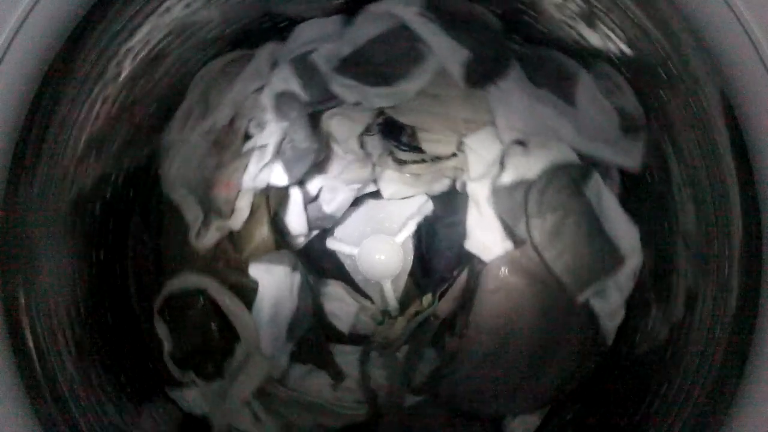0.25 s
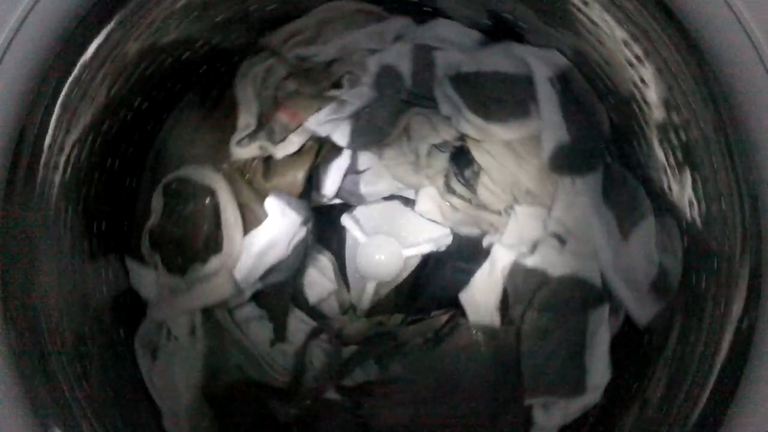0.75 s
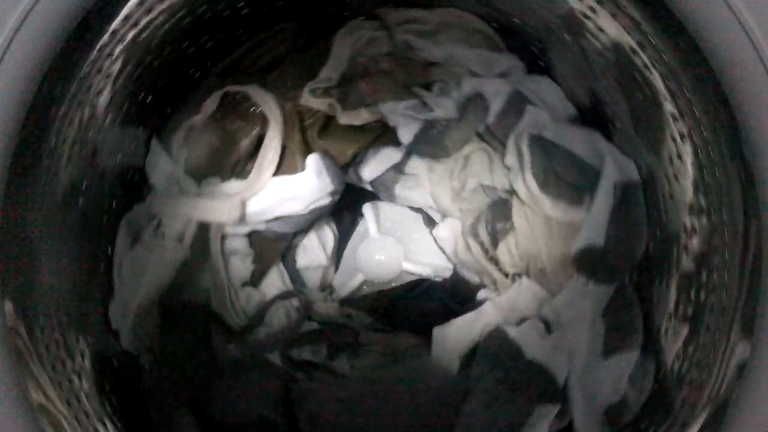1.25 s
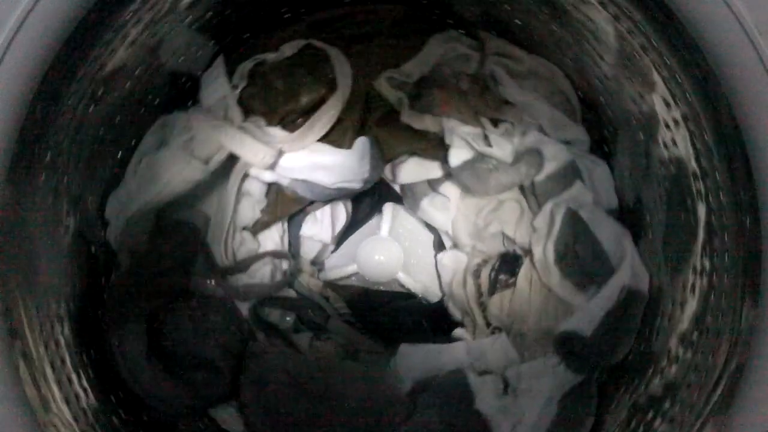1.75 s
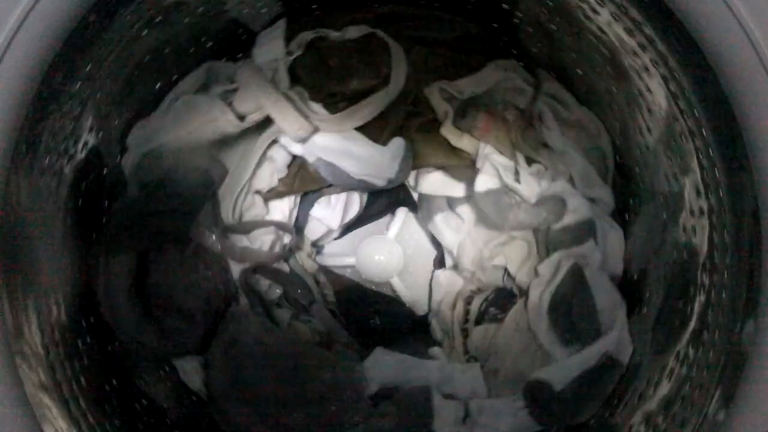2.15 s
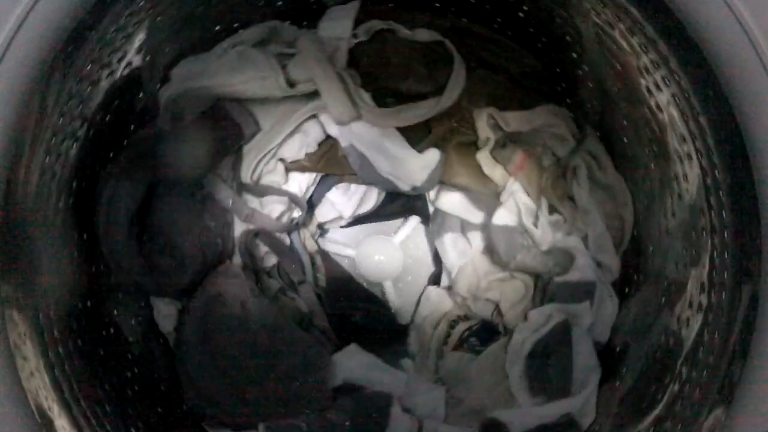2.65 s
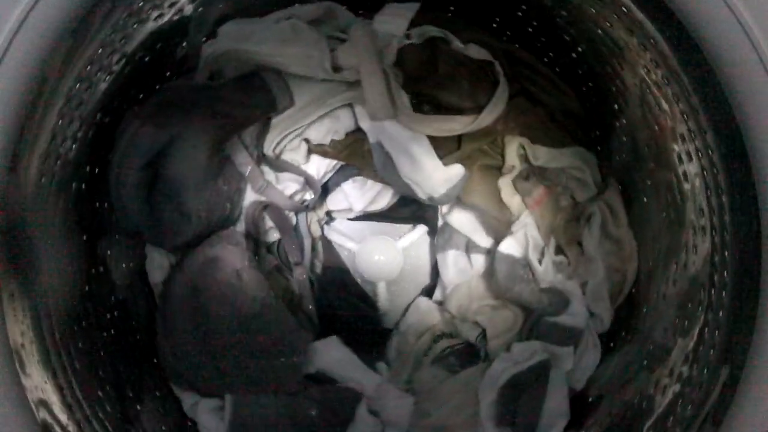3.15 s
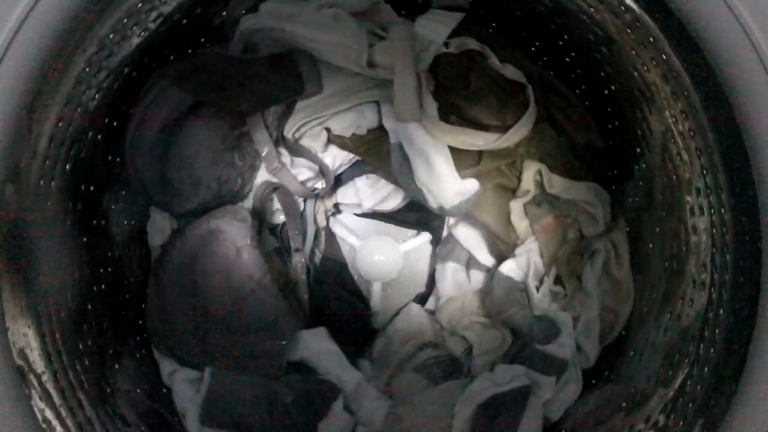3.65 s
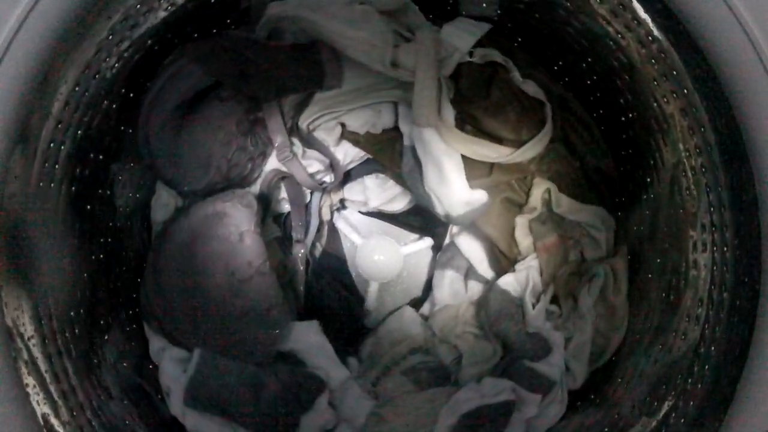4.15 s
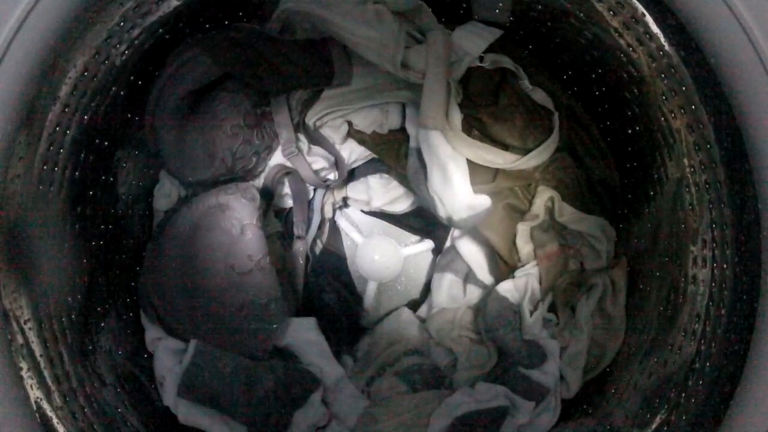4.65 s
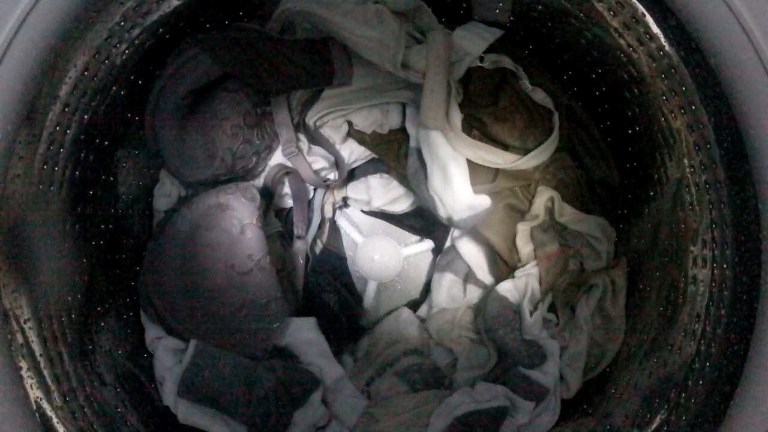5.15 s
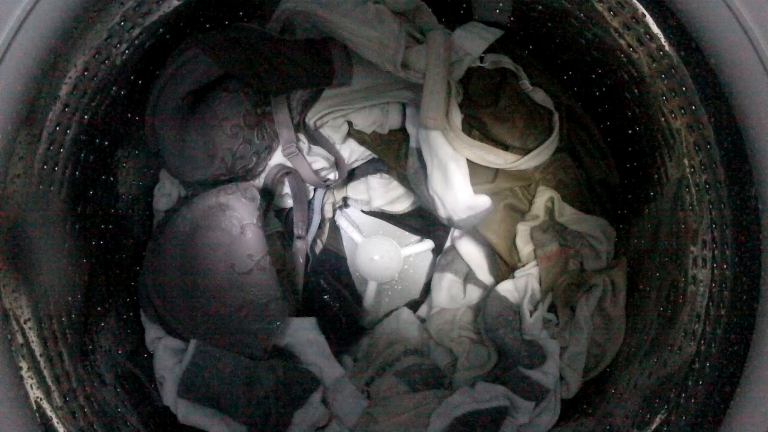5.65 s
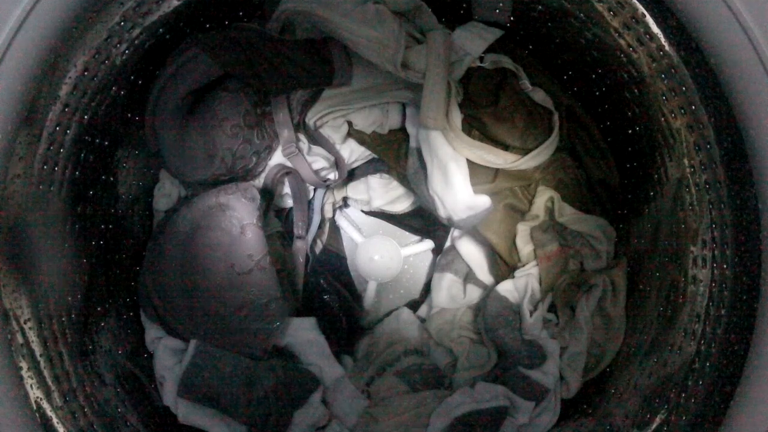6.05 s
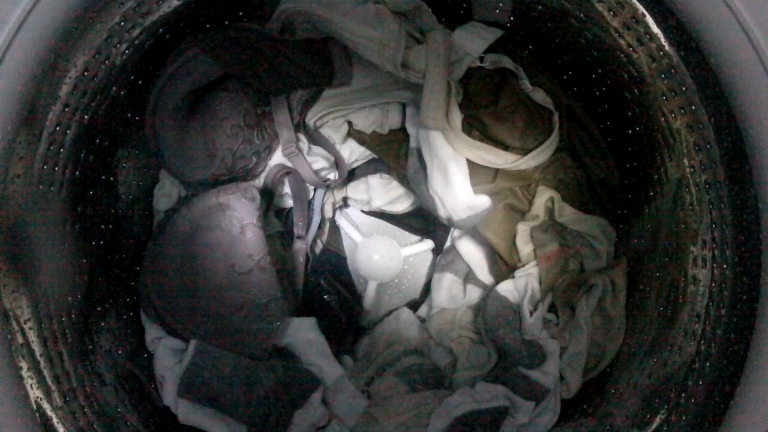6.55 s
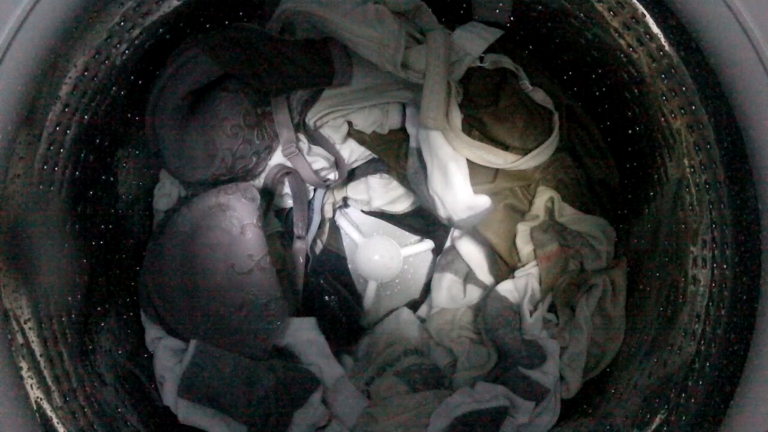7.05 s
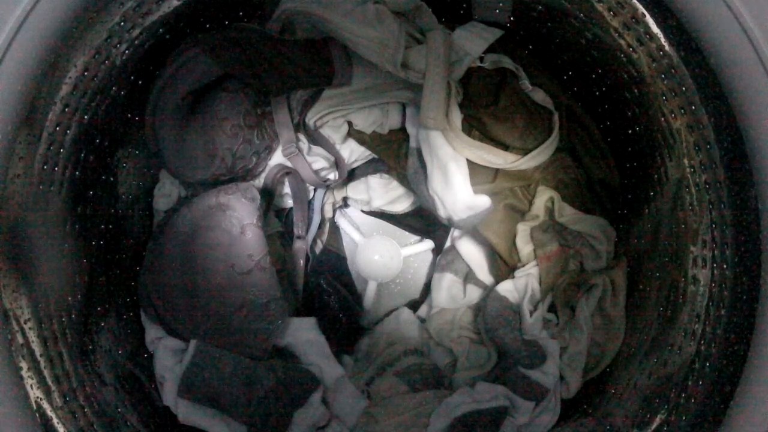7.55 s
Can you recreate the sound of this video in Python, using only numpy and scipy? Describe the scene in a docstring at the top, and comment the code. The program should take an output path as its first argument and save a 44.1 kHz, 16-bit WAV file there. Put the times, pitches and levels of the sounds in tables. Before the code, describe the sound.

Water drips and trickles through wet laundry in a steel washing machine drum, sparse at first, then a busy patter over low hum.

```python
"""Water trickles and drips through laundry into the steel drum of a washing machine: many short rising bubble
tones over splash noise, with larger drops, bright droplets, plops and gurgles on top.
The drum answers them with a short diffuse tail; a small camera hears the water through its resonant case.
Underneath lie inlet hiss, cabinet rumble, booming panels, narrow resonances and mains hum, all shaped noise or sines.
The camera holds each of 12000 samples a second as a step, so the sound is mirrored around 12 kHz."""
import sys
import numpy as np
from scipy import signal
from scipy.fft import rfft, irfft, next_fast_len
from scipy.io import wavfile
from scipy.ndimage import map_coordinates

SR = 44100
rng = np.random.default_rng(int(sys.argv[2]) if len(sys.argv) > 2 else 0)


def log_audio(samples):
    """Write samples as a 16-bit WAV file to the path given in sys.argv[1]."""
    # one column per channel
    frames = np.atleast_2d(samples).T
    # limit to full scale, then quantise
    limited = np.clip(frames, -1, 1)
    pcm = np.round(limited * 32767).astype(np.int16)
    wavfile.write(sys.argv[1], SR, pcm)


N = 343539

# Water let go by the load. Each row: start in seconds, level in dB before swell and fall, time to lose 10 dB in seconds.
SURGES = [(0.13, -32, 0.0011), (0.36, -36.5, 0.0688), (0.98, -36.5, 0.2325), (1.81, -32, 0.1189),
          (2.6, -40.5, 0.7242), (3.3, -31, 0.8326), (6.4, -43, 2)]
# Fine spray. Each row: time in seconds, level in dB rms.
SPRAY = [(0, -54.5), (.38, -51), (.75, -58), (1.0, -45.5), (1.25, -57), (1.9, -50), (2.28, -53),
         (2.75, -48.5), (3.23, -48), (3.6, -42.5), (4.1, -46.5), (4.5, -44.5), (6.0, -43), (7.45, -42.5),
         (7.79, -44.5)]
# Large drops into pooled water. Each row: start in seconds, peak in dB, starting pitch of the bubble in Hz.
DROPS = [(0.3479, -28.5, 2737), (0.3855, -22, 2543), (0.402, -23.5, 2386), (0.83, -17, 2862),
         (1.0002, -22, 2339), (1.021, -20.5, 2328), (1.0392, -6, 2279), (1.068, -9, 2569),
         (1.2938, -24.5, 2496), (1.785, -26, 2666), (1.8043, -12.5, 2660), (1.837, -23, 2003),
         (2.0203, -19.5, 2372), (2.3501, -25.5, 2259), (2.4407, -24, 2292), (2.4978, -22, 2381),
         (2.6065, -26, 2690), (2.6254, -22, 2600), (2.824, -26.5, 2543), (3.027, -23.5, 2696),
         (3.0626, -23, 2432), (3.2909, -16, 2577), (3.3025, -8.5, 2686), (3.3287, -18.5, 2593),
         (3.3856, 4, 2651), (3.3935, -8.5, 2772), (3.4348, -12.5, 2728), (3.4529, -16.5, 2536),
         (3.4955, -18.5, 2377), (3.5453, -14.5, 2566), (3.5862, -28, 2507), (3.5979, -13.5, 2472),
         (3.6328, -17, 2608), (3.7544, -27.5, 2601), (3.807, -16, 2473), (3.8462, -18.5, 2623),
         (3.87, -14.5, 2617), (3.9771, -14.5, 2431), (4.0969, -8.5, 2568), (4.181, -23.5, 2506),
         (4.2096, -17.5, 2372), (4.3072, -23.5, 2529), (4.363, -14.5, 2324), (4.4156, -16, 2524),
         (4.5802, -23.5, 2586), (4.686, -27, 2717), (4.737, -24.5, 2557), (4.8209, -12, 2454),
         (4.8935, -15.5, 2695), (5.002, -24, 2640), (5.028, -20, 2570), (5.1701, -18, 2578),
         (5.5508, -24.5, 2621), (5.753, -19.5, 2601), (5.8604, -16.5, 2622), (5.9795, -26, 2603),
         (6.026, -25.5, 2500), (6.0692, -23, 2530), (6.113, -24.5, 2530), (6.1773, -23.5, 2665),
         (6.2473, -23.5, 2574), (6.3841, -14, 2472), (6.5326, -11.5, 2326), (6.563, -25.5, 2662),
         (6.6322, -18, 2744), (6.8066, -20.5, 2605), (6.8394, -25.5, 2799), (6.857, -17.5, 2650),
         (6.9404, -19.5, 2480), (6.9788, -23, 2570), (7.1415, -17.5, 2553), (7.2268, -24.5, 2614),
         (7.2834, -10, 2436), (7.5298, -27, 2616)]
# Droplets bursting on steel and cloth. Each row: start in seconds, peak in dB, starting pitch in Hz.
DROPLETS = [(0.2086, -28.5, 4360), (0.3496, -30, 3656), (0.402, -27, 3641), (0.4484, -30.5, 3995),
            (0.826, -26.5, 3800), (1.02, -25.5, 3920), (1.0376, -19.5, 3606), (1.07, -18.5, 3859),
            (1.1458, -17, 4076), (1.4282, -24, 3727), (1.5698, -29, 3820), (1.803, -17, 3766),
            (2.022, -26, 4116), (2.2485, -29.5, 3861), (2.475, -23, 3799), (2.6536, -20, 4190),
            (2.6993, -27, 3619), (2.7412, -26, 4131), (2.9083, -24.5, 3781), (2.9435, -28.5, 5098),
            (3.292, -27.5, 4237), (3.3864, -18.5, 3612), (3.465, -19.5, 3612), (3.544, -18.5, 3806),
            (3.71, -22.5, 4490), (3.735, -28, 3710), (3.7876, -23, 3665), (3.9469, -27, 3842),
            (4.065, -28.5, 4110), (4.099, -23.5, 3791), (4.2898, -20.5, 3784), (4.414, -26.5, 3572),
            (4.6833, -24.5, 3907), (4.7044, -21, 4117), (4.8195, -20.5, 3498), (4.8653, -23, 3648),
            (4.9923, -25, 3779), (5.0055, -21.5, 3489), (5.027, -14.5, 3567), (5.1011, -19.5, 3540),
            (5.247, -21.5, 5305), (5.3418, -24.5, 5199), (5.3766, -23.5, 3575), (5.3923, -24.5, 3739),
            (5.4377, -22, 3682), (5.5065, -26, 3898), (5.5495, -22.5, 3877), (5.7068, -21, 3725),
            (5.8172, -21, 3960), (5.8449, -18, 3757), (5.899, -25, 3964), (5.9808, -22, 3686),
            (6.0262, -21, 3660), (6.164, -25, 5183), (6.1744, -26, 3611), (6.2038, -25, 3820),
            (6.3094, -22.5, 3957), (6.322, -20.5, 3737), (6.3829, -19, 3627), (6.404, -23, 3946),
            (6.468, -14.5, 3652), (6.5355, -20.5, 3575), (6.564, -17.5, 3620), (6.613, -24.5, 3467),
            (6.6312, -17, 3487), (6.755, -24.5, 3688), (6.807, -24, 4558), (6.9775, -24, 3626),
            (7.0338, -22.5, 3908), (7.082, -25, 3551), (7.1407, -18.5, 3547), (7.206, -25.5, 3544),
            (7.2828, -26.5, 3566), (7.3384, -24, 3485), (7.3861, -24.5, 3748), (7.5037, -21, 5020),
            (7.5697, -26.5, 3613), (7.619, -22.5, 3800), (7.698, -25.5, 3544)]
# Single mid-sized bubbles. Each row: start in seconds, level in dB, starting pitch in Hz.
PLOPS = [(0.7641, -40, 1752), (0.825, -42.5, 1559), (1.0395, -36.5, 1939), (1.293, -36.5, 1751),
         (1.7861, -36.5, 1671), (2.5, -43, 1508), (3.3855, -37, 1906), (3.6007, -37, 1906),
         (3.8384, -39.5, 1731), (4.5795, -34.5, 1854), (5.1958, -39.5, 1721), (5.655, -41.5, 1548),
         (6.5319, -37, 1749), (7.2818, -38.5, 1740)]
# Clusters of low bubbles. Each row: start in seconds, level in dB, middle pitch in Hz.
GURGLES = [(0.799, -50, 779.6), (1.196, -53.5, 819.2), (1.398, -61, 792.8), (1.612, -53.5, 771.8),
           (3.002, -49.5, 780), (5.623, -45.5, 824.2), (7.289, -42.5, 846.8), (7.665, -43, 831.7)]
# What the camera case lets through. Each row: frequency in Hz, gain in dB.
CASE = [(900, -44.5), (1300, -18), (1700, -14.5), (2050, -9.5), (2300, -4.5), (2620, 0.5), (3000, -5),
        (3280, -17), (3560, -7.5), (3900, -6), (4450, -10.5), (4760, -12), (5150, -6.5), (6000, -18.5),
        (7800, -76.5)]
# Colour of cabinet and pipes. Each row: frequency in Hz, relative level in dB.
RUMBLE = [(15, -54.5), (22, -22), (38, -4.5), (46, -15.5), (70, -6.5), (82, -7), (110, -5), (165, -7),
          (225, -8), (360, -11), (400, -12.5), (665, -20.5), (1200, -25.5), (1900, -18.5)]
# Boom of the lowest panel. Each row: time in seconds, mean level in dB.
BOOM = [(0, -54.5), (2.2, -57), (3.7, -50.5), (7.79, -51)]
# Murmur near 800 Hz. Each row: time in seconds, level in dB rms.
MURMUR = [(0.0, -66.5), (0.7, -62), (0.85, -60), (1.7, -58), (2.1, -65.5), (7.79, -65.5)]
# Narrow resonances of cabinet and inlet. Each row: centre in Hz, half-width in Hz, level in dB rms.
RESONANCES = [(199.36, 19.57, -55), (1728.7, 11, -76.5), (2317.9, 15.61, -49.5), (2613.8, 14.95, -51.5)]
# Valve coil on the mains. Each row: frequency in Hz, mean level in dB rms.
HUM = [(120, -49.5), (240, -58.5), (360, -64.5), (420, -75), (480, -70.5)]
# Colour of the faint noise of opposite sign in the two channels. Each row: frequency in Hz, relative level in dB.
APART = [(18, -37), (30, -6.5), (124, -5.5), (265, -7.5), (718, -16.5), (1340, -21.5), (1700, -40),
         (2210, -66), (3740, -120)]
# Slope into the band limit. Each row: frequency in Hz, gain in dB.
EDGE = [(14800, -0.5), (15150, 8.5), (15400, -33), (15640, -54)]

STEADY_DB, SURGE_RISE_S = -42.5, 0.039  # steady trickle of large drops; time constant of a surge's swell
DRUM_T60_S = 0.038075
DROP_ANSWER_DB, DROPLET_ANSWER_DB = -4, -3  # energy of the drum's answer
SPLAT_DB = -0.5  # splat against bubble
STRAY_DROP_DB, STRAY_DROPLET_DB = 11, 13  # mean peaks of the smaller random ones over trickle and spray
STRAY_SCATTER_DB = 3
BOOM_SWING_DB = 3.5  # the lowest panel booms unsteadily
HOLD_HZ, TOP_HZ = 12000, 15640  # rate of the held steps; band limit


def trickle():
    """Large drops sing low and follow the flow; fine spray sings high."""
    large = patter(250, hz=2563.2, spread=0.14981, cycles=2.3477, size_db=3.5, hiss_db=-2.5, wet_db=6.5)
    fine = patter(300, hz=4588.8, spread=0.21146, cycles=4.701, size_db=4.5, hiss_db=-4.5, wet_db=-4.5)
    return amp(flow_db()) * large + amp(curve(SPRAY)) * fine


def flow_db():
    """Level of the large drops: a steady trickle plus surges that swell and drain off."""
    t = np.arange(N) / SR
    power = amp(2 * STEADY_DB)
    for start, db, fall_s in SURGES:
        since = np.maximum(t - start, 0)
        swell = 1 - np.exp(-since / SURGE_RISE_S)
        power = power + amp(2 * db) * swell * 10 ** (-since / fall_s)
    return 10 * np.log10(power)


def patter(rate, hz, spread, cycles, size_db, hiss_db, wet_db):
    """Many random small drops (rate per second) in the drum, over splash noise, through the case; rms 1."""
    count = int(rate * N / SR)
    draw = rng.random((count, 2))
    pitch = np.clip(hz * np.exp(spread * rng.standard_normal(count)), 900, 6000)
    sizes = amp(-size_db * np.log(np.maximum(draw[:, 1], .03)))  # few large, many small
    at = (draw[:, :1] * N).astype(int) + np.arange(400)
    pulses = sizes[:, None] * bubbles(pitch, cycles)
    dry_drops = np.bincount(at.ravel(), pulses.ravel(), N + 400)[:N]

    noise = rng.standard_normal(N)
    splash = filtered(noise, lambda f: np.exp(-(np.log((f + 1) / hz) / 0.5333) ** 2))
    splash = splash * amp(1.5 * wobble(22))

    wet, step = np.zeros(N + SR), SR // 4
    for i in range(0, N, step):  # drops land in other places, so the answer keeps changing
        part = drum(dry_drops[i:i + step], wet_db)
        wet[i:i + len(part)] += part
    water = unit(wet[:N]) + amp(hiss_db) * unit(splash)
    return unit(signal.fftconvolve(water, case_ring())[:N])


def bubbles(hz, cycles, size=400):
    """One row per drop: trapped air rings as a damped tone that swells for some cycles while its pitch rises."""
    u = np.arange(size) / SR * hz[:, None] / cycles
    envelope = (u * np.exp(1 - u)) ** 2
    return envelope * np.sin(2 * np.pi * cycles * u * (1 + 0.006473 * u))


def drum(x, wet_db):
    """x with the steel drum's diffuse answer: noise that builds over a few ms and dies away."""
    t = np.arange(SR // 8) / SR
    rise = 1 - np.exp(-(t / .0035) ** 3)
    tail = rng.standard_normal(len(t)) * amp(-60 * t / DRUM_T60_S) * rise
    tail = tail * amp(wet_db) / np.linalg.norm(tail)
    tail[0] = 1  # the direct sound
    return signal.fftconvolve(x, tail)


def case_ring(size=2048):
    """Causal impulse response of the camera case, from the folded cepstrum of its gain."""
    gain = amp(along(CASE, np.fft.rfftfreq(size, 1 / SR)))
    cepstrum = irfft(np.log(np.maximum(gain, 1e-5)))
    cepstrum[1:size // 2] *= 2
    cepstrum[size // 2 + 1:] = 0
    return irfft(np.exp(rfft(cepstrum)))[:size // 2]


def drops():
    """Large drops each ring as one bubble, answered by the drum."""
    out = np.zeros(N)
    smaller = stray(count=25, level_db=flow_db() + STRAY_DROP_DB, low_hz=2384.8, high_hz=2983.5)
    for start, db, hz in [*DROPS, *smaller]:
        bubble = bubbles(np.array([hz]), cycles=1.8189)[0]
        out = strike(out, start, db, drum(bubble, DROP_ANSWER_DB))
    return out


def droplets():
    """Droplets burst as a short bright splat of noise over a small bubble, answered by the drum."""
    out, t = np.zeros(N), np.arange(400) / SR
    bright = signal.butter(N=4, Wn=(3300, 7000), btype="band", fs=SR, output="sos")
    envelope = amp(SPLAT_DB - 60 * t / 0.03435) * (1 - np.exp(-t / 0.000905))
    smaller = stray(count=55, level_db=curve(SPRAY) + STRAY_DROPLET_DB, low_hz=3521.7, high_hz=5139.5)
    for start, db, hz in [*DROPLETS, *smaller]:
        splat = signal.sosfilt(bright, rng.standard_normal(400)) * envelope
        bubble = bubbles(np.array([hz]), cycles=1.9522)[0]
        out = strike(out, start, db, drum(bubble + splat, DROPLET_ANSWER_DB))
    return out


def stray(count, level_db, low_hz, high_hz):
    """Rows of start, peak dB and Hz at random times, louder where the flow is stronger, mostly low in pitch."""
    when, pitch = rng.random((count, 2)).T
    db = level_db[(when * N).astype(int)] + STRAY_SCATTER_DB * rng.standard_normal(count)
    return list(zip(when * N / SR, db, low_hz * (high_hz / low_hz) ** pitch ** 2))


def strike(out, start, db, pulse):
    """Adds the pulse through the case at its start, scaled to its early peak."""
    hit = np.convolve(pulse, case_ring())
    shaped = np.zeros(N + SR)
    shaped[round(start * SR):][:len(hit)] = amp(db) * hit / np.abs(hit[:300]).max()
    return out + shaped[:N]


def plops():
    """One mid-sized bubble each, ringing longer than a drop."""
    out = np.zeros(N + SR)
    for start, db, hz in PLOPS:
        tone = drum(bubbles(np.array([hz]), cycles=2.804, size=1200)[0], wet_db=1.0)
        out[round(start * SR):][:len(tone)] += amp(db) * tone
    return out[:N]


def gurgles():
    """Clusters of four large slow bubbles within 40 ms, deep in the wet load."""
    out = np.zeros(N + SR)
    for start, db, hz in GURGLES:
        for lag, bend in rng.random((4, 2)):
            pitch = np.array([hz * (0.92968 + 0.1448 * bend)])
            tone = drum(bubbles(pitch, cycles=4.94, size=2000)[0], wet_db=-3.5)
            out[round((start + .04 * lag) * SR):][:len(tone)] += amp(db) * tone / 2
    return out[:N]


def inflow():
    """The smooth, steady hiss of water in the inlet: noise through the case."""
    return amp(-50) * unit(signal.fftconvolve(rng.standard_normal(N), case_ring())[:N])


def machine():
    """Cabinet rumble, booming panels and narrow resonances under the mains hum."""
    noise = rng.standard_normal(N) * amp(0.744 * wobble(3.5002))
    rumble = unit(filtered(noise, lambda hz: amp(along(RUMBLE, hz)) * (hz < 2500)))
    boom = amp(curve(BOOM) + BOOM_SWING_DB * wobble(5)) * band(56.12, 19.72)
    murmur = amp(curve(MURMUR)) * band(828.11, 100)
    steady = sum(amp(db) * band(hz, width) for hz, width, db in RESONANCES)
    return amp(-46.5) * rumble + boom + murmur + steady + hum()


def hum():
    """Mains harmonics of the valve coil, as sines that waver slightly in level and phase."""
    t, out = np.arange(N) / SR, np.zeros(N)
    for hz, db in HUM:
        level = np.sqrt(2) * amp(db + 0.22 * wobble(2.7))
        out += level * np.sin(2 * np.pi * hz * t + 0.071 * wobble(4))
    return out


def band(hz, width_hz):
    """Noise of rms 1 in one resonance, a bell around its centre."""
    return unit(filtered(rng.standard_normal(N), lambda f: np.exp(-((f - hz) / width_hz) ** 2)))


def amp(db):
    """Gain of a level in dB."""
    return 10 ** (np.asarray(db) / 20)


def unit(x):
    """x at rms 1."""
    return x / np.sqrt(np.mean(x ** 2) + 1e-20)


def along(points, hz):
    """Rows of Hz and value, read on a log frequency axis."""
    f, v = np.transpose(points)
    return np.interp(np.log(hz + 1), np.log(f + 1), v)


def curve(rows):
    """Rows of seconds and value, as one value per sample."""
    return np.interp(np.arange(N) / SR, *np.transpose(rows))


def wobble(rate):
    """A smooth random curve, rate knots a second."""
    knots = rng.standard_normal(int(N * rate / SR) + 4)
    return map_coordinates(knots, [np.arange(N) * rate / SR])


def filtered(x, response):
    """x shaped by a response of frequency."""
    m = next_fast_len(N + SR // 2)
    return irfft(rfft(x, m) * response(np.fft.rfftfreq(m, 1 / SR)), m)[..., :N]


def scene():
    """One microphone, with its faint hiss, feeds both channels."""
    water = trickle() + drops() + droplets() + plops() + gurgles() + inflow()
    sound = water + machine() + amp(-56) * rng.standard_normal(N)
    return np.array([sound, sound])


def record(dry):
    """Sample and hold: the band repeats on both sides of the hold rate under a sinc slope; then clip and band limit."""
    kept = np.clip(filtered(dry, lambda hz: hz < HOLD_HZ / 2), -1, 1)
    mirrored = kept * (1 + 2 * np.cos(2 * np.pi * HOLD_HZ * np.arange(N) / SR))
    apart = amp(-68.5) * unit(filtered(rng.standard_normal(N), lambda hz: amp(along(APART, hz))))
    held = filtered(mirrored, lambda hz: np.sinc(hz / HOLD_HZ)) + np.array([apart, -apart])
    return filtered(np.clip(held, -1, 1), lambda hz: amp(along(EDGE, hz)) * (hz < TOP_HZ))


dry = scene()
out = record(dry)
log_audio(out)
```